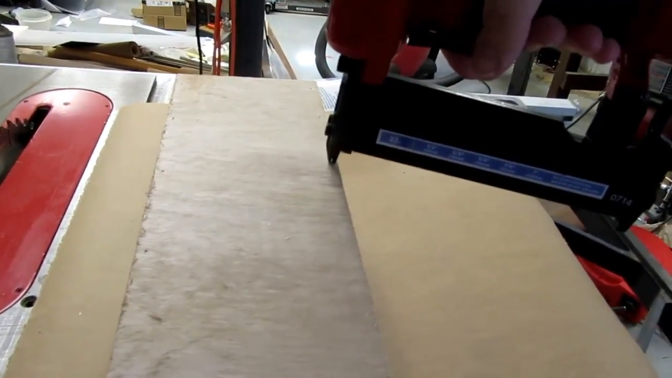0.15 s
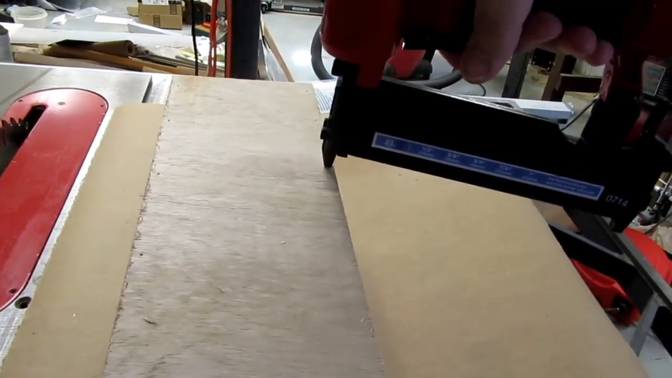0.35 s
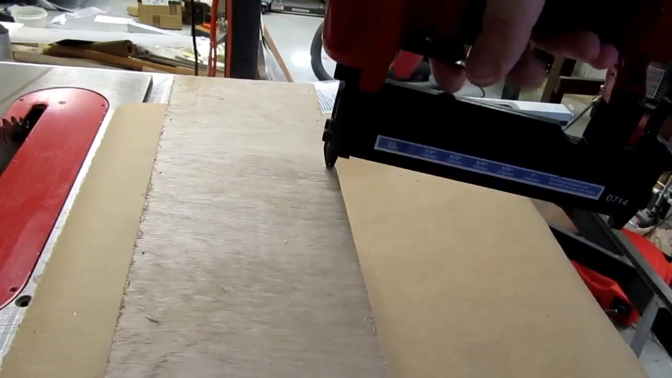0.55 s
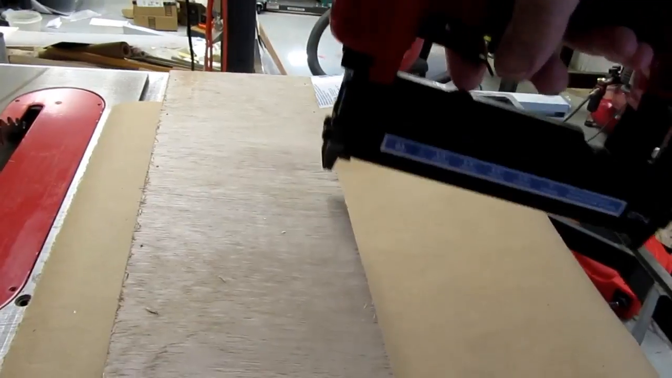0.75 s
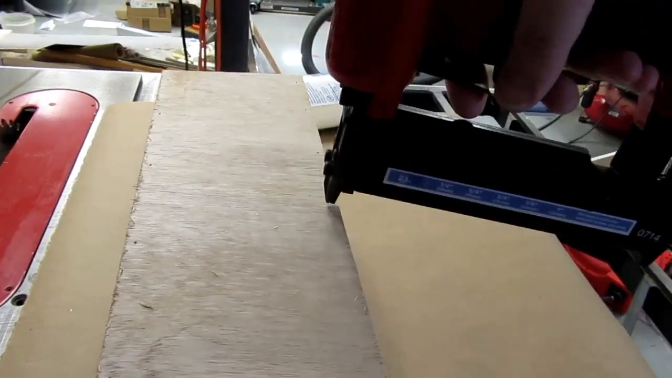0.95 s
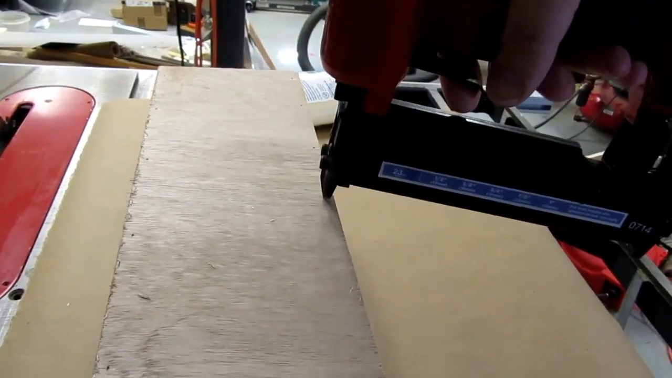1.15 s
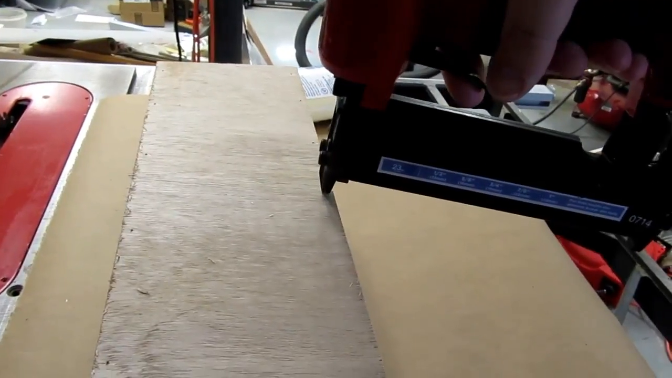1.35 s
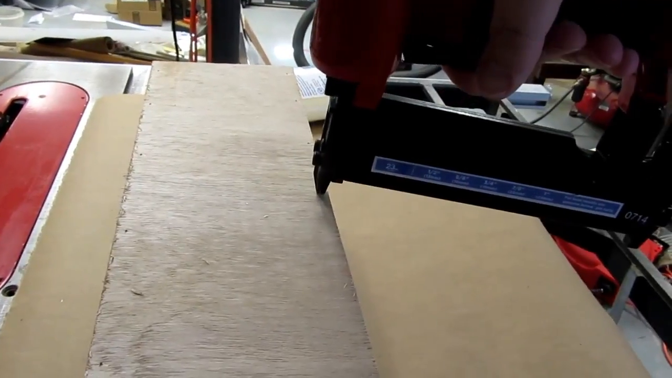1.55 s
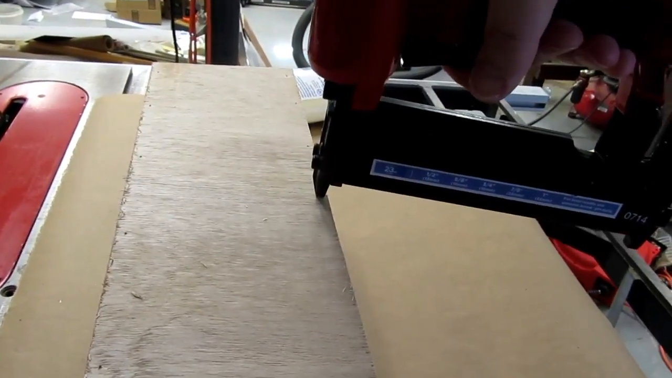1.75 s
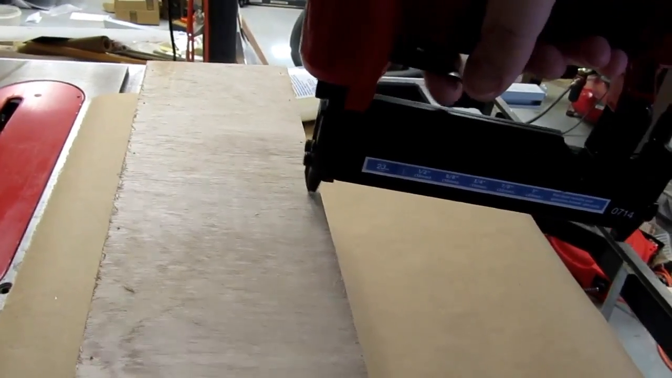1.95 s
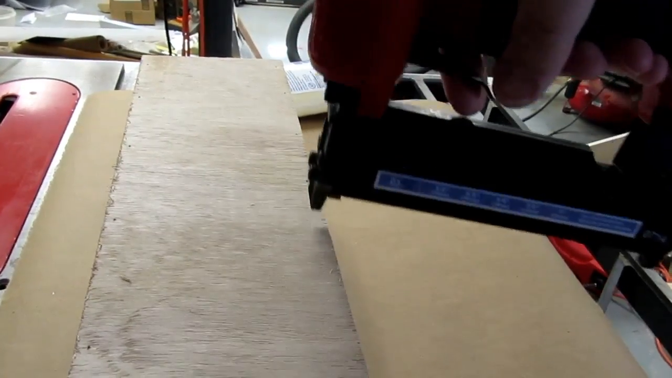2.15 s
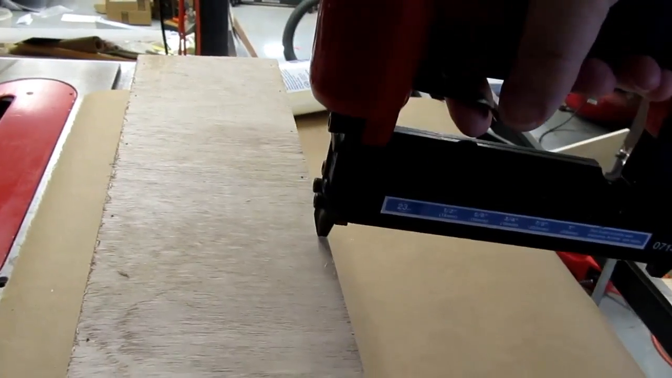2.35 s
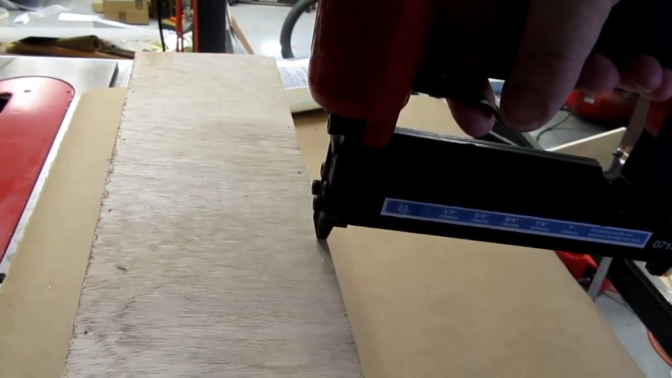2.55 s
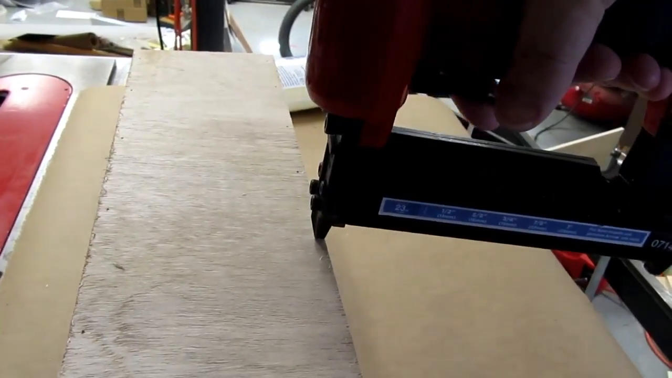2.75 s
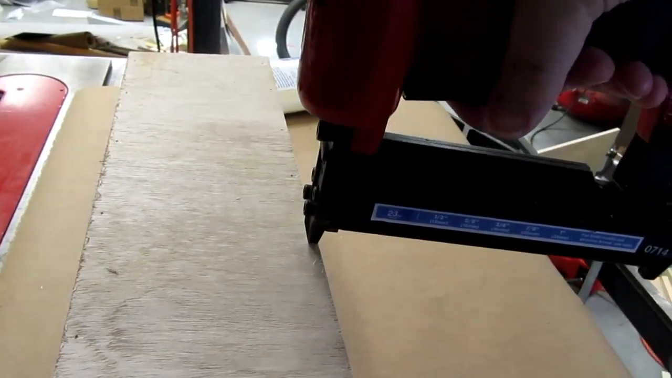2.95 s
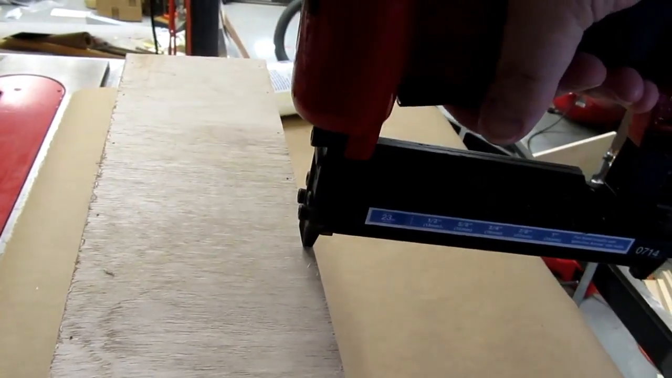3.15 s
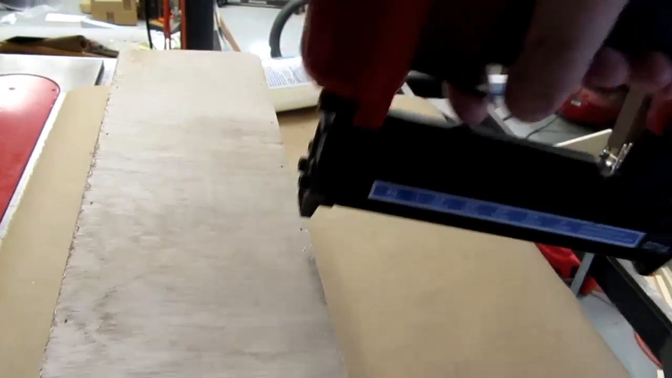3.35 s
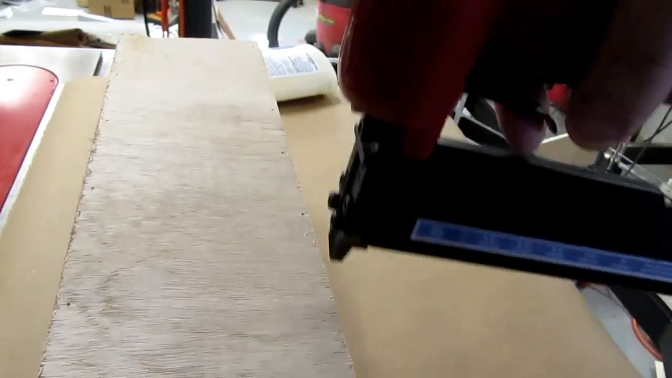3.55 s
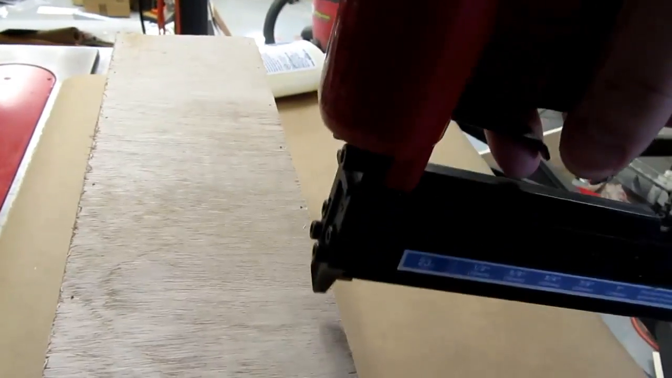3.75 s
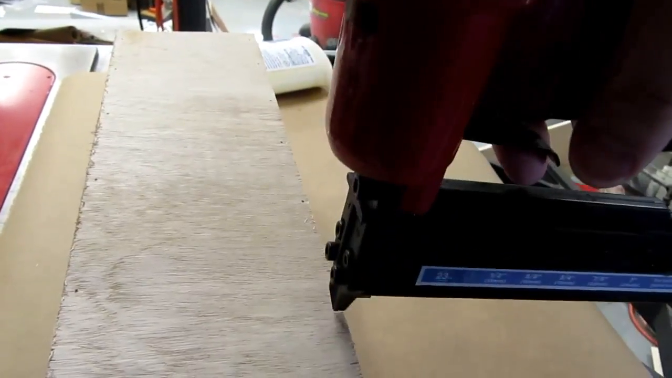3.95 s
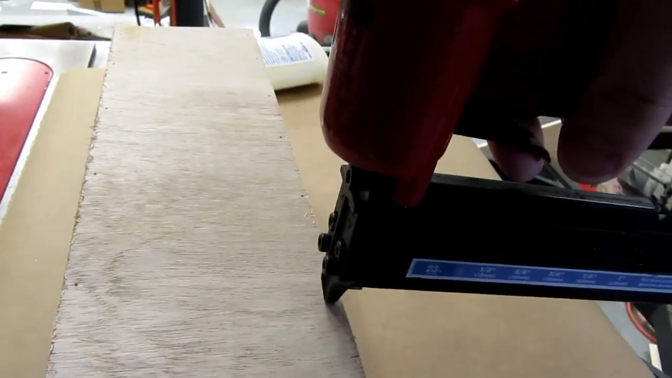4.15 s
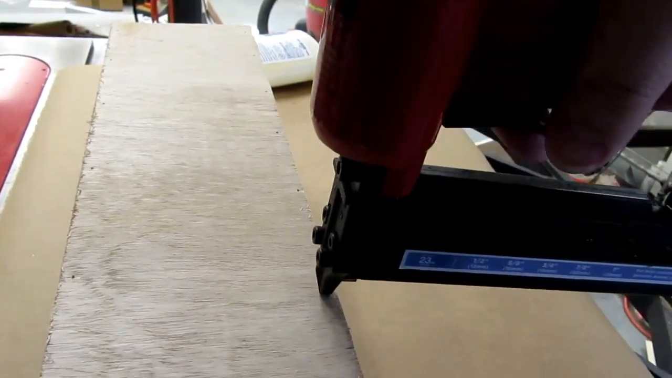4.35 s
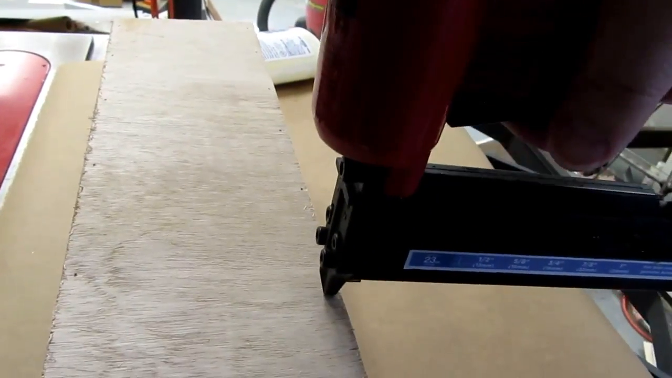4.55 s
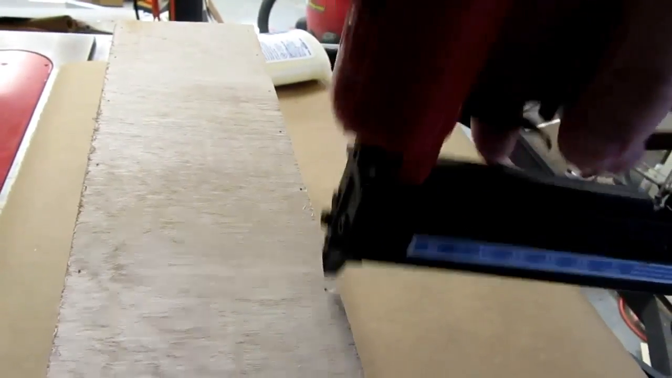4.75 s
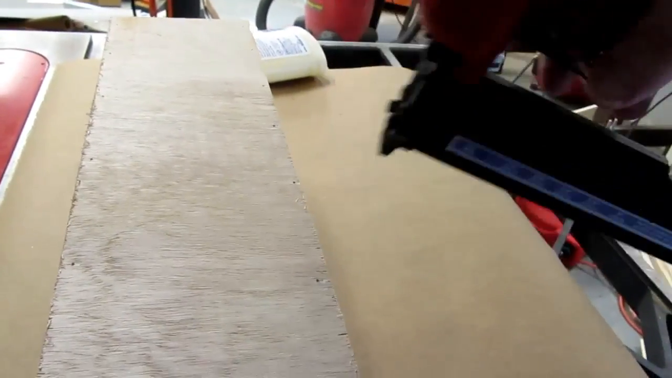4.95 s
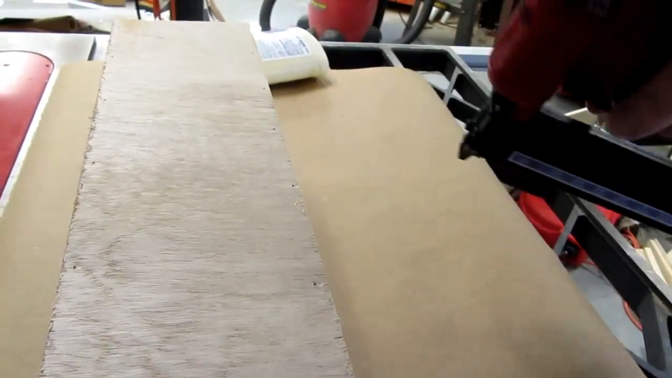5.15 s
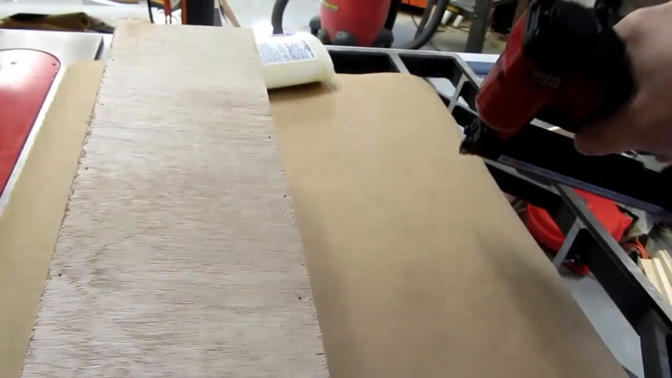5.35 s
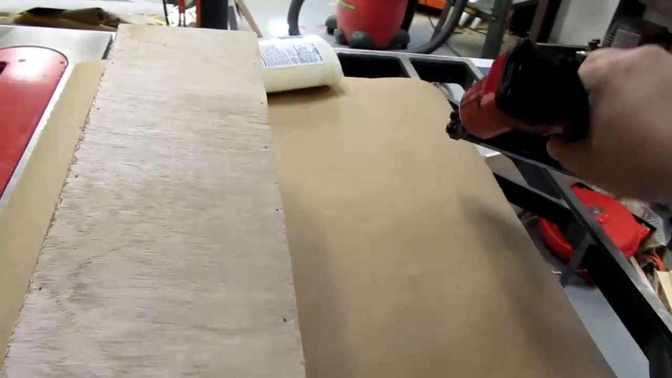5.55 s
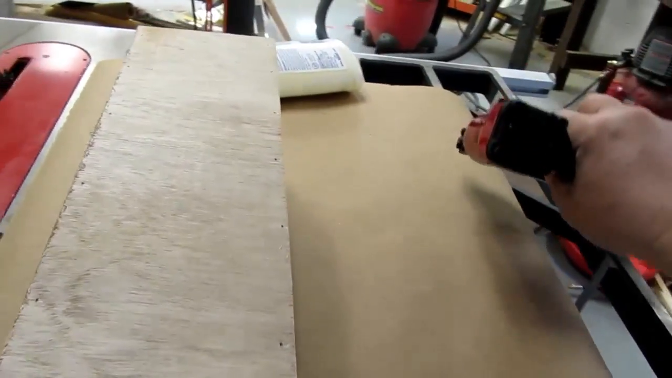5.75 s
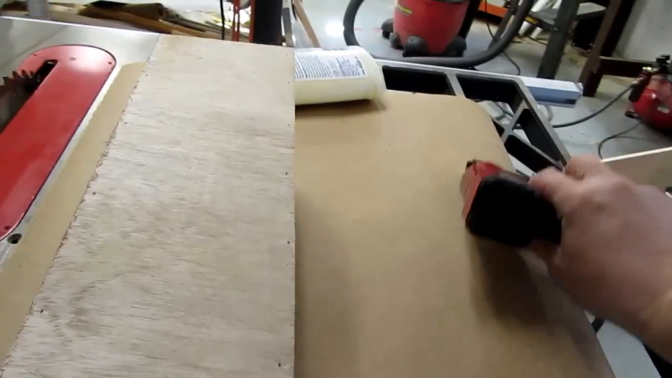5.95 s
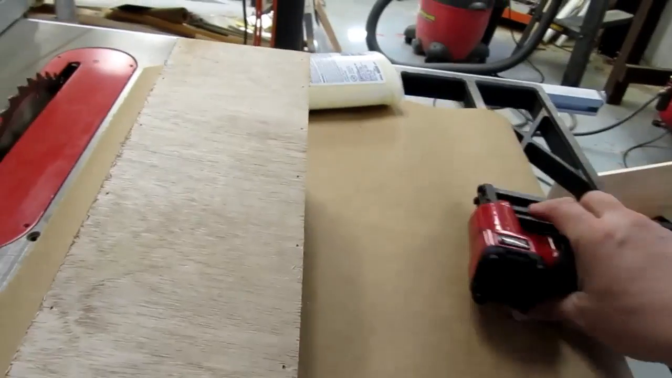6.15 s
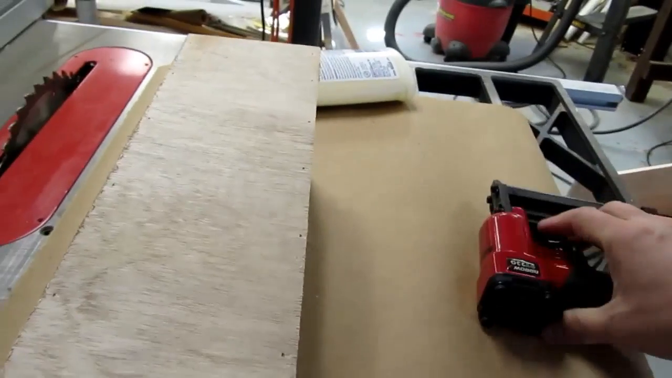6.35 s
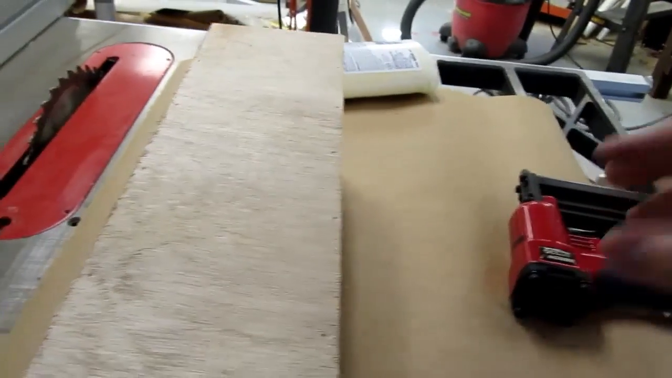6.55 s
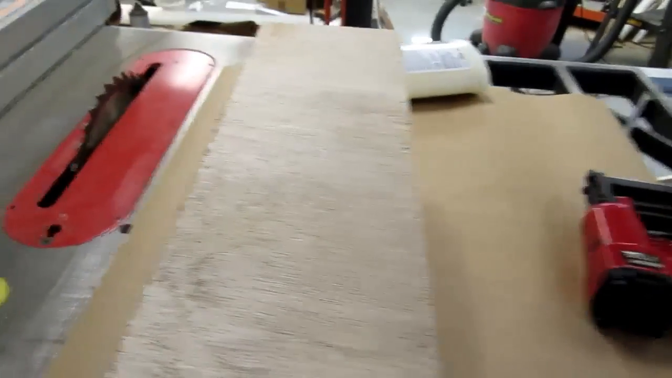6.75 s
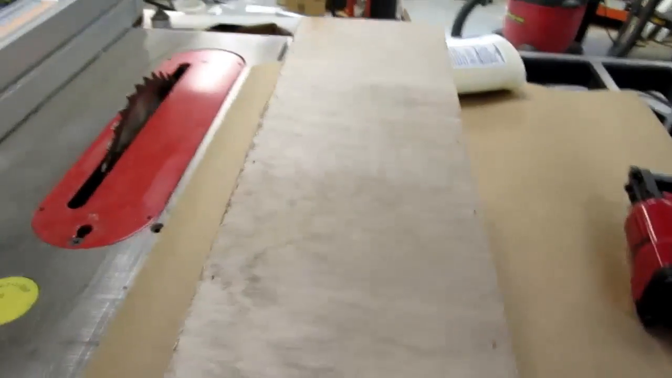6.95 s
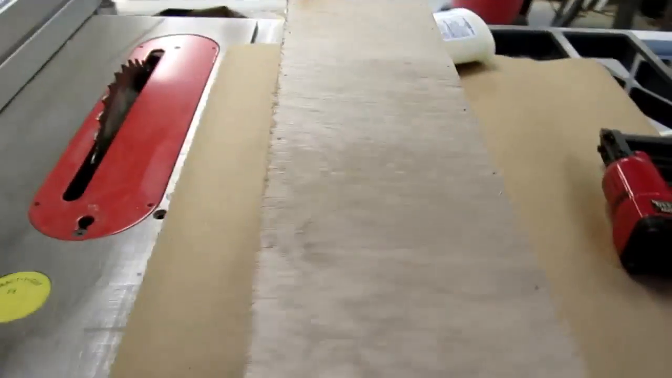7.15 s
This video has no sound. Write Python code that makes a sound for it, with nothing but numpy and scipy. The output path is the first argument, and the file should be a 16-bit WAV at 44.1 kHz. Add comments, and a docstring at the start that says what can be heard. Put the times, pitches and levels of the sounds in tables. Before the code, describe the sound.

A pneumatic pin nailer fires four times into plywood, each shot a hissing double snap, then the tool is set down with hollow wooden knocks.

```python
"""Over workshop hum and faint leak hiss a pneumatic pin nailer fires four times into plywood, then is laid on the bench.
Each pull vents air in puffs until the driver strikes; each release vents again until the piston slaps home.
Air is enveloped noise; blows are pressure pulses with rattle and ring; the bench is a bank of beating modes.
At the end the tool drags over card and a hand shifts on the camera body: filtered, fluttering noise."""
import sys
import numpy as np
from scipy import signal
from scipy.fft import rfft, irfft
from scipy.io import wavfile
from scipy.ndimage import uniform_filter1d

SR = 44100
rng = np.random.default_rng(int(sys.argv[2]) if len(sys.argv) > 2 else 0)


def log_audio(samples):
    """Write samples as a 16-bit WAV file to the path given in sys.argv[1]."""
    # one column per channel
    frames = np.atleast_2d(samples).T
    # limit to full scale, then quantise
    limited = np.clip(frames, -1, 1)
    pcm = np.round(limited * 32767).astype(np.int16)
    wavfile.write(sys.argv[1], SR, pcm)


N = 321487  # samples


def amp(db):
    """dB to gain."""
    return 10 ** (np.asarray(db, float) / 20)


def evened(x):
    """Scales to rms 1."""
    return x / np.sqrt(np.mean(x ** 2) + 1e-20)


def read(points, hz):
    """Interpolates a (Hz, value) table on a log-frequency axis."""
    f, value = np.transpose(points)
    return np.interp(np.log(hz + 1), np.log(f + 1), value)


def add(mix, start_s, sound):
    """Mixes a sound in at start_s, cut at the end of the mix."""
    part = mix[round(start_s * SR):][:len(sound)]
    part += sound[:len(part)]


def noise(shape, size=N):
    """Noise of rms 1 with the given spectrum in relative dB."""
    gain = amp(read(shape, np.fft.rfftfreq(size, 1 / SR)))
    return evened(irfft(rfft(rng.standard_normal(size)) * gain, size))


def flutter(depth_db, span_s):
    """Random gain of rms 1; its dB swing has rms depth_db and changes over about span_s."""
    width = max(round(span_s * SR), 2)
    slow = uniform_filter1d(uniform_filter1d(rng.standard_normal(N), width), width)
    return evened(amp(depth_db * evened(slow)))


def track(rows):
    """Table columns at every sample, and a gate open while the table lasts."""
    t = np.arange(N) / SR
    s, *columns = np.transpose(rows)
    gate = np.clip(np.minimum(t - s[0], s[-1] + 0.025 - t) / 0.022, 0, 1)
    return gate, [np.interp(t, s, c) for c in columns]


# Puffs through the valve, each until the next puff or until the blow shuts the valve.
# Each row: start in seconds, rise in seconds, jet level at first in dB, jet level at last in dB.
PUFFS = [(.2412, 0.0053, -9.5, -15), (.257, 0.0023, -14.5, -17), (.43, 0.0044, -23, -11),
         (.455, 0.0016, -12, -13.5), (1.563, .0075, -52, -32.5), (1.629, .002, -32.5, -20.5),
         (1.6477, 0.0021, -13, -12.5), (1.669, 0.0034, -13, -15.5), (1.785, 0.0038, -18.5, -12.5),
         (1.813, 0.0016, -9, -15.5), (2.9613, 0.0064, -14, -10), (2.972, 0.0019, -10.5, -13.5),
         (2.984, 0.0014, -9.5, -17.5), (3.107, 0.0084, -18, -13.5), (3.141, .002, -11.5, -11.5),
         (3.155, .002, -8, -14.5), (4.418, 0.0043, -7.5, -14.5), (4.442, 0.0018, -6, -17),
         (4.452, 0.003, -12, -12), (4.617, .006, -12.5, -11), (4.638, 0.0024, -6.5, -14)]
# Spectra of jet, low roar, port whistle and air on the microphone.
# Each row: frequency in Hz, relative level in dB.
JET_SPECTRUM = [(1500, -27.5), (2900, -10), (3800, -7), (5000, -7), (6200, -4), (8300, -2), (11000, -5.5),
                (12500, -8.5), (14500, -9)]
ROAR_SPECTRUM = [(30, -39), (100, -17), (200, -5.5), (300, -4.5), (500, -4), (950, -4), (1700, -3),
                 (2800, -4), (5500, -16)]
PORT_SPECTRUM = [(3000, -30.5), (3350, -5.5), (3540, 0), (3750, -5), (4100, -30)]
GUST_SPECTRUM = [(25, -31.5), (50, -12), (90, 0), (140, -2.5), (250, -15), (400, -35.5)]
# Levels against the jet; "last" is the puff before the blow.
ROAR_DB, ROAR_LAST_DB, ROAR_PER_DB = -8, -6, 0.93  # growth per dB of mean flow over -12 dB
WHISTLE_DB, WHISTLE_LAST_DB, GUST_DB, BLEED_DB = -16, -16, -23, -17
THIN_DB, THIN_SPAN_DB = -38.25, 13.5  # hiss is all thin up to THIN_DB, full-bodied one span above
PAUSE_S, SHUT_S = .0015, 0.0056  # gap before the next puff; valve shuts this long after the blow


def air():
    """Turbulent jet, port whistle and roar: the flow rises, ramps in dB, is cut off and bleeds away."""
    jet, pipe, roar, bleed = np.zeros((4, N))
    starts = np.array(PUFFS)[:, 0]
    shuts = np.array(BLOWS)[:, 0] + SHUT_S
    for s, rise_s, first_db, last_db in PUFFS:
        shut_s = shuts[shuts > s][0]
        length_s = np.append(starts[starts > s] - PAUSE_S, shut_s).min() - s
        last = s + length_s > shut_s - 1e-4
        t = np.arange(0, length_s + .2, 1 / SR)
        flow_db = first_db + (last_db - first_db) * np.minimum(t / length_s, 1)
        flow = amp(flow_db) * np.clip(t / rise_s, 0, 1) ** 3
        since_shut = np.maximum(t - length_s, 0)
        bleed_gate = np.exp(-since_shut / 0.03) * (1 - np.exp(-since_shut / .002))
        add(bleed, s, amp(BLEED_DB) * flow * bleed_gate)
        flow *= np.exp(-since_shut / 0.0014)
        add(jet, s, flow)
        add(pipe, s, amp(WHISTLE_LAST_DB if last else WHISTLE_DB) * flow)
        roar_db = ROAR_LAST_DB if last else ROAR_DB
        roar_db += ROAR_PER_DB * ((first_db + last_db) / 2 + 12)
        add(roar, s + 0.0017, amp(roar_db) * flow)  # pressure builds a little after the hiss
    thin = noise([(3000, -19), (7000, -4), (11000, -1.0), (15000, -2.5)])
    full = np.clip((20 * np.log10(jet + 1e-9) - THIN_DB) / THIN_SPAN_DB, 0, 1)
    texture = np.sqrt(full) * noise(JET_SPECTRUM) + np.sqrt(1 - full) * thin
    hiss = jet * flutter(2.2, .0003) * texture
    whistle = (.4 + .6 * full) * pipe * noise(PORT_SPECTRUM)
    buffet = amp(GUST_DB) * uniform_filter1d(jet, 200) * noise(GUST_SPECTRUM)
    low_roar = roar * flutter(4.4, 0.0005) * noise(ROAR_SPECTRUM)
    return hiss + whistle + low_roar + bleed * thin, buffet


# Blows of the piston, down on the pin or up on its bumper.
# Each row: start in seconds, slap level in dB, steel ring level in dB.
BLOWS = [(0.2804, 5, -12.5), (0.475, -4, -42.5), (1.6963, 5.5, -37), (1.8347, -2.5, -46.5),
         (3.001, 4.5, -32.5), (3.1803, -2, -38.5), (4.4826, 6.5, -24), (4.661, 0.5, -32)]
# Rattle of the plywood sheet. Each row: frequency in Hz, relative level in dB.
PLYWOOD_SPECTRUM = [(30, -40.5), (100, -15), (300, -7), (730, -6), (1300, -7), (2000, -4), (3000, -8.5),
                    (5000, -12.5), (10000, -32.5)]
STEEL_HZ, STEEL_T60_S = 3569, .09
SLAP_HZ = 2000
RATTLE_DB, RATTLE_PER_DB = -11, 2  # level at a 0 dB blow; rise per dB, so hard blows rattle far more


def piston():
    """Suck-and-push of pressure over a lower thud; the sheet rattles 2 ms later and the driver rings."""
    out = np.zeros(N)
    t = np.arange(round(.15 * SR)) / SR
    for s, slap_db, steel_db in BLOWS:
        u = (t - .0004) * SLAP_HZ  # cycles from the middle of the slap
        slap = np.sin(2 * np.pi * u) * np.exp(-(u / np.where(u < 0, .55, .8)) ** 2)
        thud = 0.35 * np.sin(2 * np.pi * 0.52 * u) * np.exp(-(u / 1.1) ** 2)
        late = np.maximum(t - .0022, 0)
        shake = (1 - np.exp(-late / 0.00014)) * (np.exp(-late / 0.00092) + 0.16 * np.exp(-late / 0.025))
        rattle = shake * noise(PLYWOOD_SPECTRUM, size=len(t))
        steel = np.sin(2 * np.pi * STEEL_HZ * t) * amp(-60 * t / STEEL_T60_S) * np.clip(t / .004, 0, 1)
        rattle_db = RATTLE_DB + RATTLE_PER_DB * slap_db
        blow = amp(slap_db) * (slap + thud) + amp(rattle_db) * rattle + amp(steel_db) * steel
        add(out, s, blow)
    return out


# Tool knocks on the bench.
# Each row: start in seconds, crack level in dB, crack treble tilt in dB (x2 at 8 kHz, x3 at 15 kHz),
# bench ring level in dB, ring tilt in dB per octave.
KNOCKS = [(5.8367, -9.5, 2.5, -16.5, 7), (6.053, -25.5, -14, -41, -1), (6.073, -23, -16, -36.5, 3),
          (6.205, -32.5, -7, -53, 3), (6.2463, -25.5, 0, -43, -10), (6.3275, -34, -6, -54, -9),
          (6.3354, -10.5, 1.5, -16, -0.5), (6.36, -42, -4, -26, -1), (6.49, -55, -8, -35.5, -6.5),
          (6.635, -26, -5, -34, -1)]


def knocks():
    """Short contact crack; the bench rings, unsteadily while the tool settles, over a dull wooden body."""
    out = np.zeros(N)
    t = np.arange(SR // 2) / SR
    settle = flutter(1.8, 0.0087)
    for s, crack_db, tilt_db, ring_db, ring_tilt_db in KNOCKS:
        colour = [(50, -50), (300, -25), (1000, 9.5), (2000, 18), (5000, 6.5),
                  (8000, 1 + 2 * tilt_db), (15000, 3 * tilt_db - 17)]
        crack = noise(colour, size=len(t)) * np.clip(t / .0006, 0, 1)
        crack *= np.exp(-t / 0.0012) + 0.15 * np.exp(-t / 0.0095)
        body = noise([(150, -15), (300, 0.0), (500, 0.5), (900, -4), (1500, -15.0), (3000, -35)], size=len(t))
        body *= 0.21 * amp(-60 * t / 0.54) * np.clip(t / 0.0055, 0, 1)
        wobble = settle[round(s * SR):][:len(t)]
        ring = wobble * bench_ring(ring_tilt_db) + body
        add(out, s, amp(crack_db) * crack + amp(ring_db) * ring)
    return out


# Modes of the bench top. Each row: frequency in Hz, level in dB, T60 in seconds.
BENCH_MODES = [(256.6, -11.5, 0.24), (357, -6, 0.078), (451.8, -7.5, 0.3), (609, -18, 0.22),
               (720, -17, 0.097), (810, -15.5, 0.14), (936, -17.5, 0.077), (1224, -15, 0.14),
               (1490, -23, 0.071), (1770, -25, 0.14), (2367, -16, 0.036), (2930, -27, 0.071),
               (3360, -41, 0.16)]


def bench_ring(tilt_db_per_octave):
    """Decaying modes of the bench top; each is a close pair that beats."""
    t = np.arange(SR // 2) / SR
    hz, db, t60_s = np.transpose(BENCH_MODES)[:, :, None]
    phase, split, twin_phase = rng.random((3, len(BENCH_MODES), 1))
    twin_hz = hz * (1 + 0.11 * (split - .5))
    pair = np.sin(2 * np.pi * (hz * t + phase)) + 0.38 * np.sin(2 * np.pi * (twin_hz * t + twin_phase))
    level_db = db + tilt_db_per_octave * np.log2(hz / 450) - 60 * t / t60_s
    return (amp(level_db) * pair).sum(0) * np.clip(t / 0.0021, 0, 1)


# Tool drags over the card on the bench.
# Each row: time in seconds, scrape level in dB, treble level against it in dB.
DRAG = [(5.96, -55, -1), (6.045, -49, -4.5), (6.055, -39, -8), (6.09, -32.5, -13.5), (6.172, -59, 5),
        (6.254, -42, -2.5), (6.32, -45, -4), (6.336, -26, -9), (6.362, -44, -6), (6.424, -39, -7.5),
        (6.5, -87, -9)]
# Friction on card and its treble. Each row: frequency in Hz, relative level in dB.
CARD_SPECTRUM = [(40, -14), (200, -5), (500, 6.5), (1000, -2), (2800, 0), (3100, -3.5), (4400, -6),
                 (7000, -26), (15000, -45)]
CARD_TREBLE_SPECTRUM = [(2000, -9), (5000, 1.5), (8000, -2.5), (11400, -6), (15000, -13)]
DRAG_RING_DB = -1.5  # bench modes against the scrape


def drag():
    """Gritty friction on card, which also keeps the bench modes sounding."""
    gate, (scrape_db, treble_db) = track(DRAG)
    grit = flutter(2.0, 0.0026)
    ring = evened(signal.fftconvolve(grit * rng.standard_normal(N), bench_ring(0))[:N])
    scrape = grit * (noise(CARD_SPECTRUM) + amp(treble_db) * noise(CARD_TREBLE_SPECTRUM))
    return gate * amp(scrape_db) * (scrape + amp(DRAG_RING_DB) * ring)


# Dry ticks of small parts. Each row: start in seconds, level in dB, pitch in Hz.
TICKS = [(0.1211, -31.5, 9000), (1.4357, -27.5, 8200), (4.286, -34.5, 7100), (6.075, -23, 9000),
         (6.426, -32, 9000), (6.442, -31, 10000), (7.2292, -16, 10900), (7.236, -25, 11000)]


def ticks():
    """One-sided push with a sine on top, both dying within a fraction of a millisecond."""
    out = np.zeros(N)
    t = np.arange(200) / SR
    for s, level_db, hz in TICKS:
        add(out, s, amp(level_db) * (0.43 + np.sin(2 * np.pi * hz * t)) * np.exp(-t / .0001))
    return out


# Hand shifts on the camera.
# Each row: time in seconds, level of the rub on the shell in dB, level of the dry skin slide in dB.
HAND = [(6.78, -68, -69.5), (6.826, -65, -64), (6.85, -44.5, -67), (6.92, -51.5, -71), (6.964, -43, -60.5),
        (7.14, -49.5, -57.5), (7.165, -47.5, -48.5), (7.214, -47.5, -47), (7.29, -54.5, -58)]
# Shell resonances. Each row: frequency in Hz, width in Hz, level in dB.
SHELL = [(1430, 290, 0), (1990, 170, 3.5), (2630, 350, 0.5), (3640, 210, -2.5), (4200, 120, -4),
         (3000, 540, -6.5), (5270, 1200, -11)]
# Dry skin. Each row: frequency in Hz, relative level in dB.
SKIN_SPECTRUM = [(4500, -19), (5300, -4), (6200, -6), (7500, 1), (8500, -8), (9700, -1), (11500, -2),
                 (12900, 3), (15000, -10)]
RUSTLE_SKIN_DB, RUSTLE_THUMP_DB = 3.5, -14.5  # rustle against skin slide and against thumps


def hand():
    """Skin rubs the camera shell, which colours it with its resonances; thumps travel through the body."""
    gate, (rub_db, skin_db) = track(HAND)
    hz = np.fft.rfftfreq(N, 1 / SR)
    shell = sum(amp(db) / (1 + 1.3j * (hz - f) / width) ** 2 for f, width, db in SHELL)
    rub = evened(irfft(rfft(rng.standard_normal(N)) * shell, N))
    thump = noise([(70, -23), (140, 6), (190, -10), (253, 2.5), (380, -8.0), (600, -48)])
    thump *= flutter(4.6, 0.0068)
    fingers = landings()
    rustle = noise([(450, -5.5), (700, 0), (1050, -2.5), (1500, -23.5)])
    rustle *= amp(skin_db + RUSTLE_SKIN_DB) + amp(RUSTLE_THUMP_DB) * fingers
    dry_rub = amp(rub_db) * rub + amp(skin_db) * noise(SKIN_SPECTRUM) + rustle
    return gate * (flutter(1.4, 0.0012) * dry_rub + fingers * thump)


# Fingers land on the camera body. Each row: peak time in seconds, level in dB.
THUMPS = [(6.849, -40.5), (6.924, -40), (7.126, -50), (7.28, -55)]
THUMP_RISE_S, THUMP_FALL_S = 0.037, 0.061


def landings():
    """Exponential swell and fall of each thump."""
    t = np.arange(N) / SR
    return sum(amp(db) * np.exp(-abs(t - s) / np.where(t < s, THUMP_RISE_S, THUMP_FALL_S))
               for s, db in THUMPS)


# Hose leak, which comes nearer or turns away with the tool.
# Each row: time in seconds, hiss level in dB, level of its top band in dB.
LEAK_LEVELS = [(0, -66.5, -77), (1.5, -68.5, -66), (2.899, -64.5, -67.5), (3.5, -64.5, -62.5),
               (4.35, -61, -63.5), (4.85, -66.5, -66), (5.4, -64, -71.5), (5.8, -58.5, -68),
               (6.4, -61, -63.5), (7.29, -68, -79)]
# Machine hum, leak hiss and the leak's top band. Each row: frequency in Hz, relative level in dB.
HUM_SPECTRUM = [(15, -63.5), (25, -40.5), (58, -7), (113, 0.5), (172, -1.5), (205, -6), (280, -3),
                (350, -3), (488, -12.5), (582, -13.5), (1080, -16), (2810, -25), (5000, -34), (6500, -63),
                (11000, -120)]
LEAK_SPECTRUM = [(2650, -40.5), (4500, -11), (5350, -11), (6640, -5.5), (7440, 0), (9020, -4), (9980, -8.5),
                 (10800, -9.5), (11500, -9), (15000, -40.5), (22000, -120)]
LEAK_TOP_SPECTRUM = [(10500, -24), (12000, -8.5), (13200, 0), (14200, -7), (15000, -5.5)]
HUM_DB = -51.5


def shop():
    """Low machine hum and the thin hiss of a leak, both as shaped noise."""
    t = np.arange(N) / SR
    s, *levels = np.transpose(LEAK_LEVELS)
    leak, top = (amp(np.interp(t, s, db)) for db in levels)
    hum = amp(HUM_DB) * noise(HUM_SPECTRUM) * flutter(0.22, 0.043)
    return hum + leak * noise(LEAK_SPECTRUM) + top * noise(LEAK_TOP_SPECTRUM)


# Decay of the room. Each row: frequency in Hz, T60 in seconds.
WALLS = [(100, 0.5), (500, 0.24), (2000, 0.23), (6000, 0.3), (10000, 0.2), (14000, 0.29)]


def room(x):
    """Dense echoes, longest in the bass; three noise tails take turns so the ring varies with time."""
    out = np.zeros(N)
    turn = np.arange(N) / SR / .11
    for k in range(3):
        hz, t, z = signal.stft(rng.standard_normal(SR // 2), SR, nperseg=256)
        decay = amp(-60 * t / read(WALLS, hz)[:, None])
        tail = signal.istft(z * decay, SR, nperseg=256)[1]
        tail *= np.clip((np.arange(len(tail)) / SR - .004) / 0.0058, 0, 1)
        share = np.sqrt(2 / 3) * np.cos(np.pi * (turn + k / 3))
        out += signal.fftconvolve(x * share, tail / np.linalg.norm(tail))[:N]
    return out


def scene():
    """Nailer, bench, hand and shop at one microphone; the hand and shop stay dry."""
    vent, buffet = air()
    blows = piston()
    bench = knocks() + drag() + ticks()
    echoes = room(amp(-17) * vent + amp(-16.5) * blows + amp(-11.5) * bench)
    return (vent + buffet + blows + bench + echoes + hand() + shop())[None]


LOUD_DB, LOUD_SPAN_DB = -28, 6  # sinking starts at LOUD_DB, is full one span above
SINK_DB_PER_S, CREEP_DB_PER_S, FIRST_GAIN_DB = 39, 3.5, 0  # creep runs throughout, against the sink
EDGE_HZ = 15050


def record(dry):
    """Gain sinks while the sound is loud and creeps back to 0 dB; peaks are rounded off; then low-pass."""
    power_db = 10 * np.log10(abs(uniform_filter1d(dry[0] ** 2, size=400)) + 1e-12)
    loud = np.clip((power_db - LOUD_DB) / LOUD_SPAN_DB, 0, 1)
    drift_db = FIRST_GAIN_DB + np.cumsum(CREEP_DB_PER_S - SINK_DB_PER_S * loud) / SR
    gain_db = drift_db - np.maximum.accumulate(np.maximum(drift_db, 0))  # never above 0 dB
    levelled = dry * amp(gain_db)
    rounded = levelled / (1 + levelled ** 4) ** .25
    low_pass = signal.firwin(511, EDGE_HZ, window=("kaiser", 9), fs=SR)
    return signal.oaconvolve(rounded, low_pass[None], "same")


dry = scene()
out = record(dry)
log_audio(out)
```